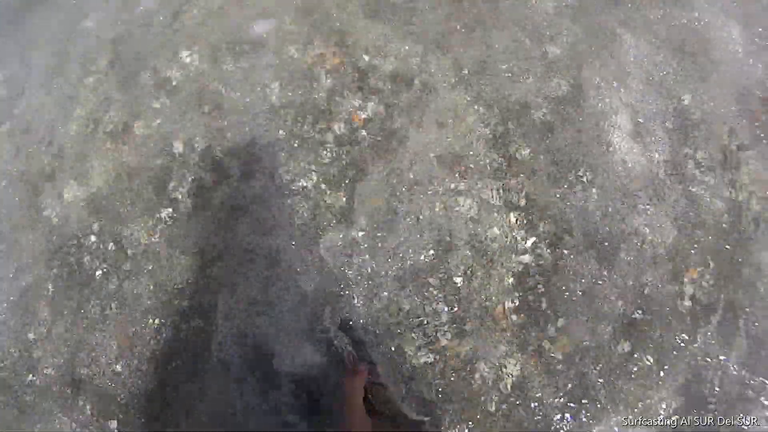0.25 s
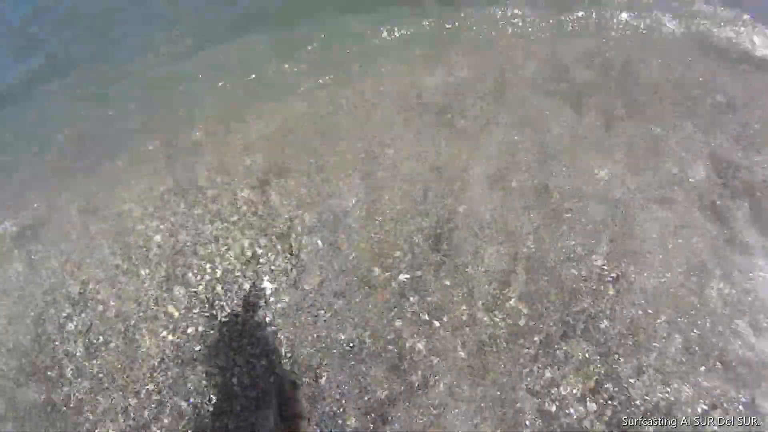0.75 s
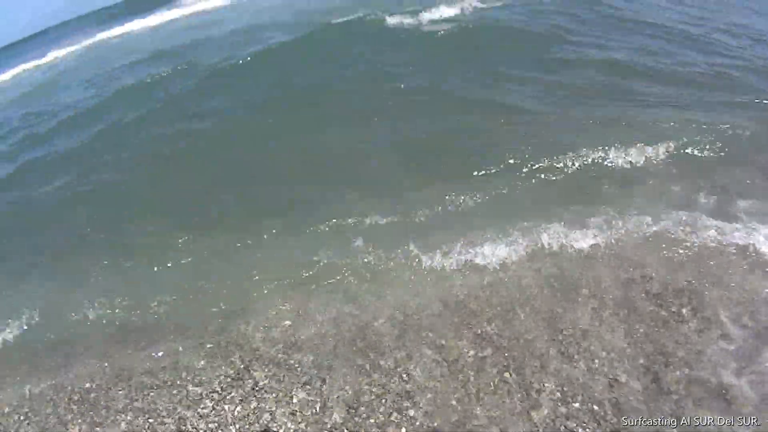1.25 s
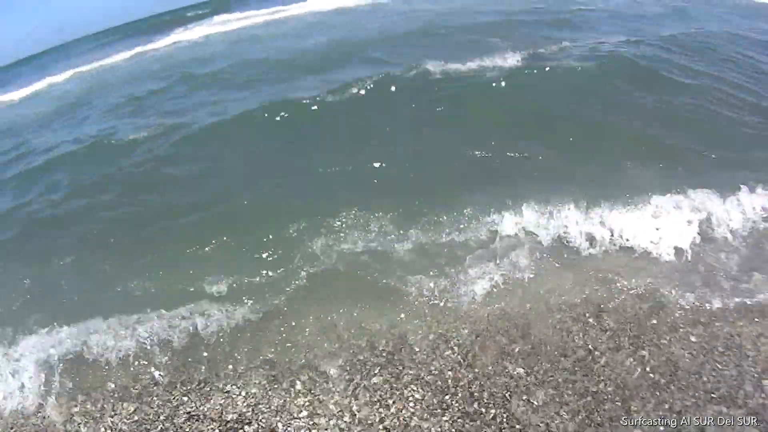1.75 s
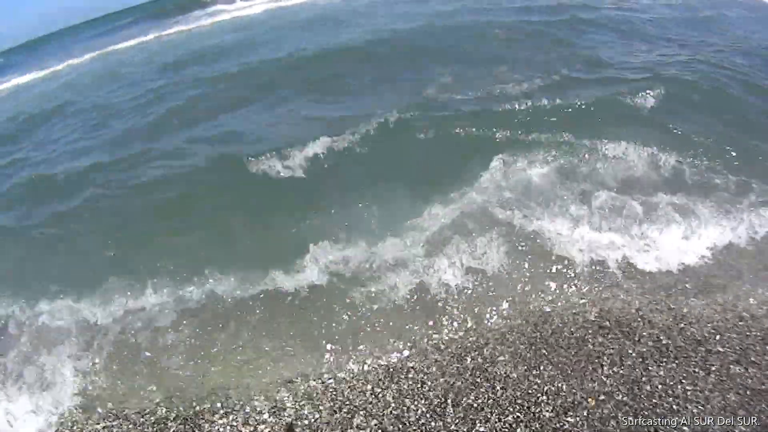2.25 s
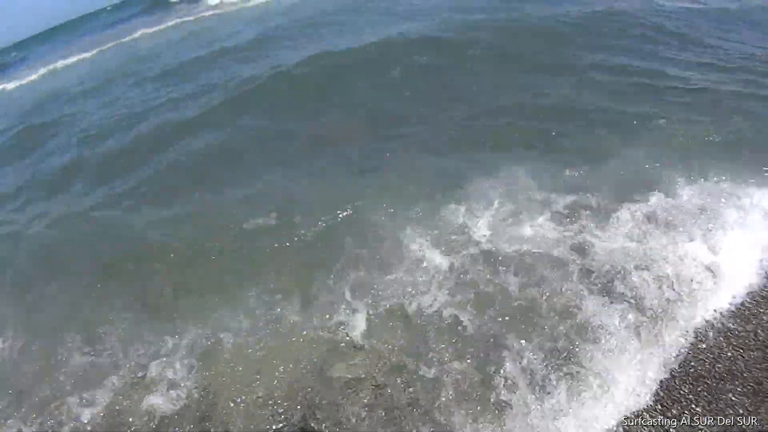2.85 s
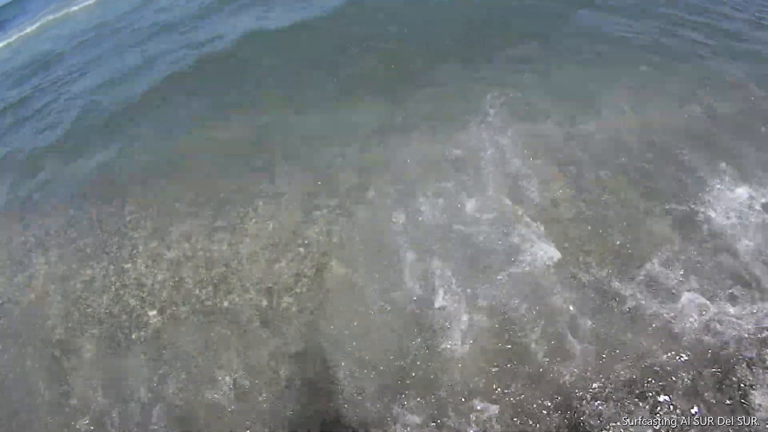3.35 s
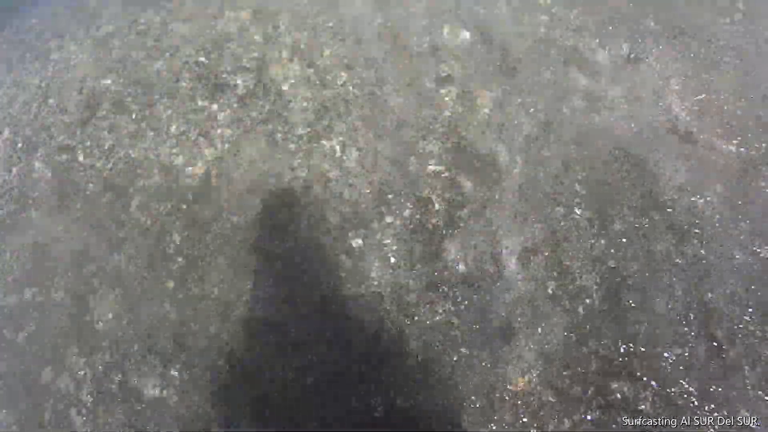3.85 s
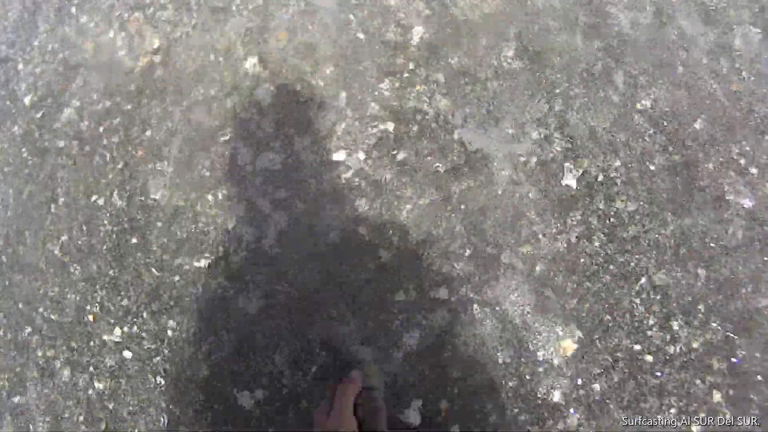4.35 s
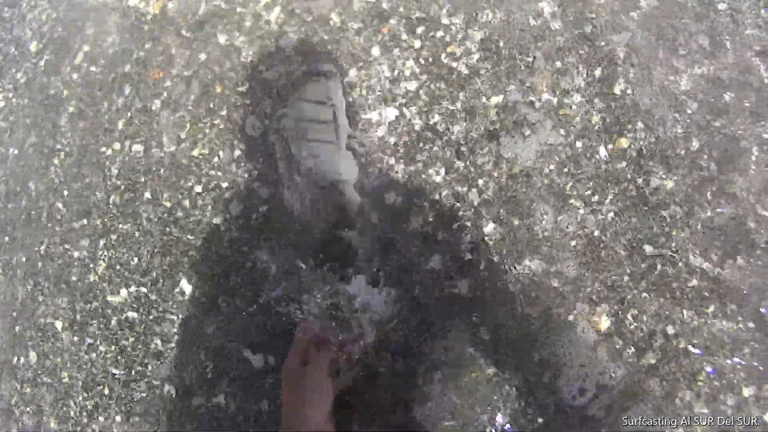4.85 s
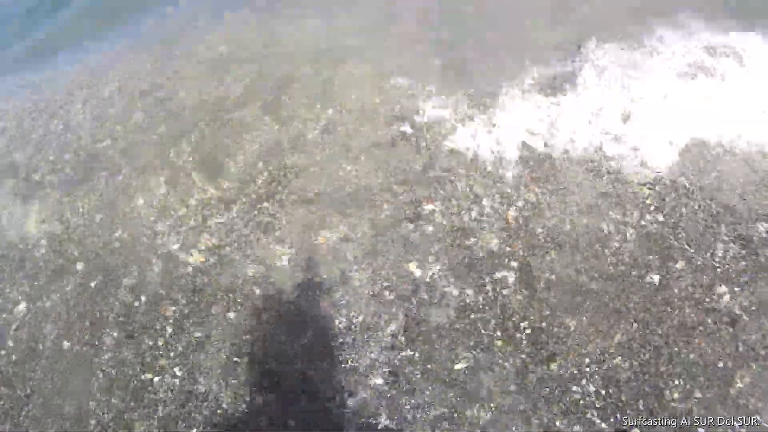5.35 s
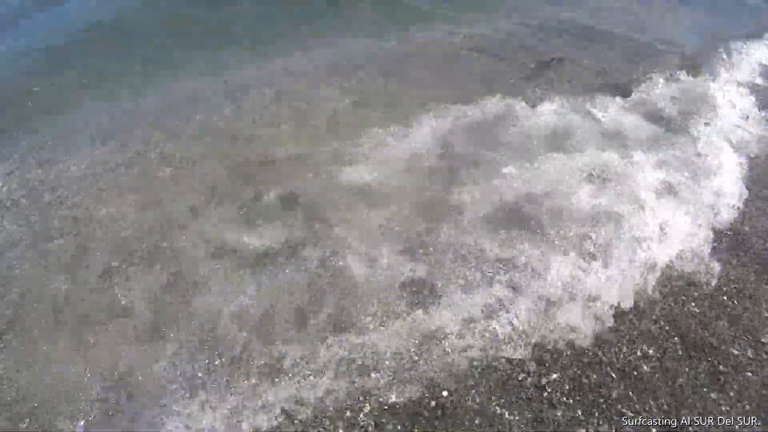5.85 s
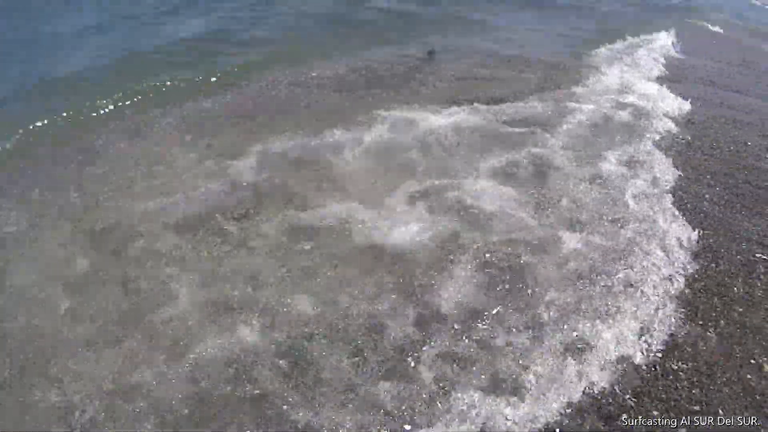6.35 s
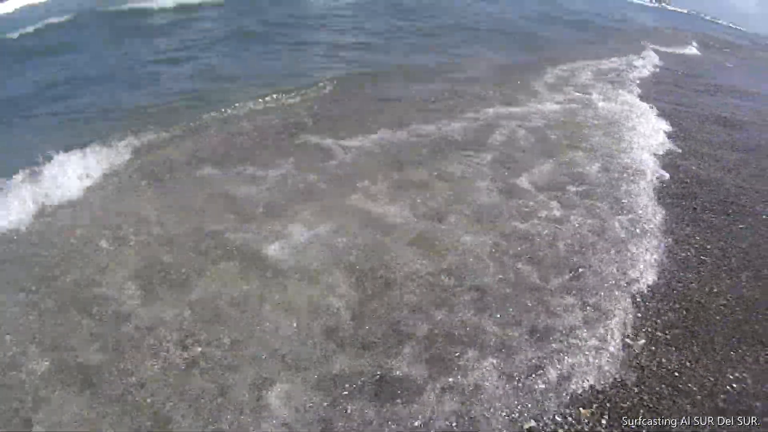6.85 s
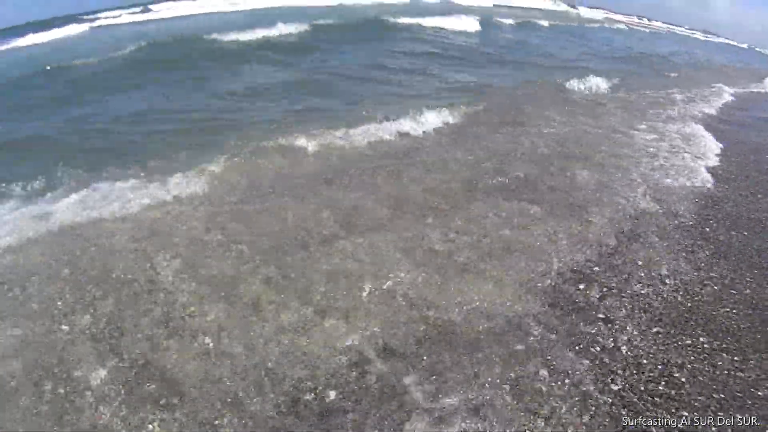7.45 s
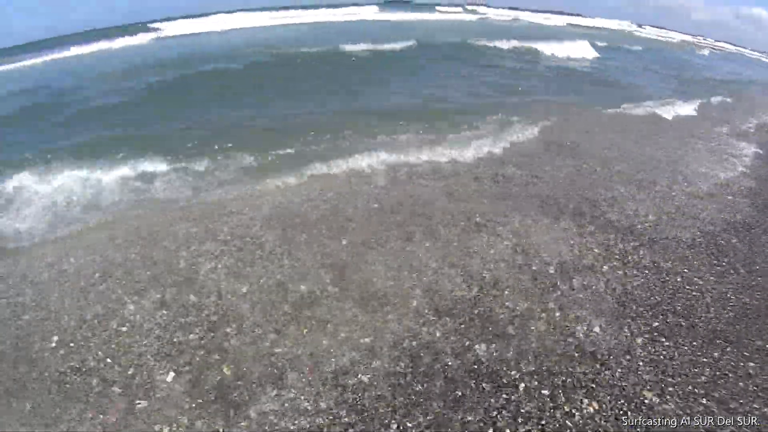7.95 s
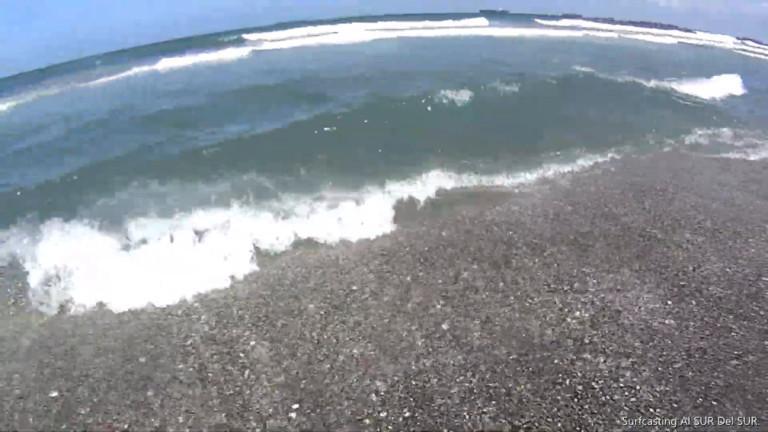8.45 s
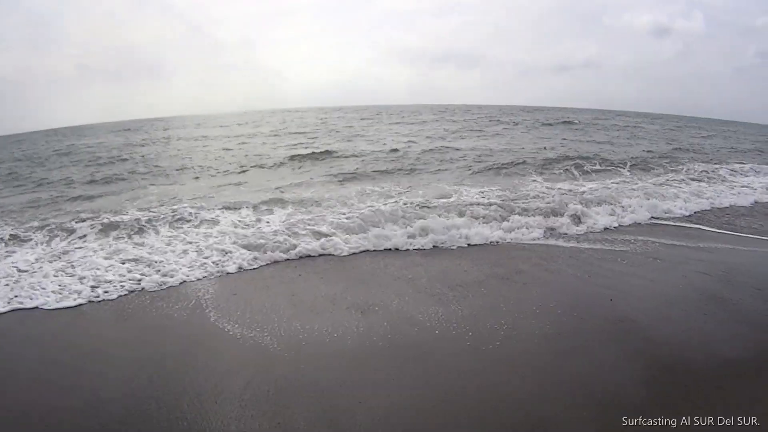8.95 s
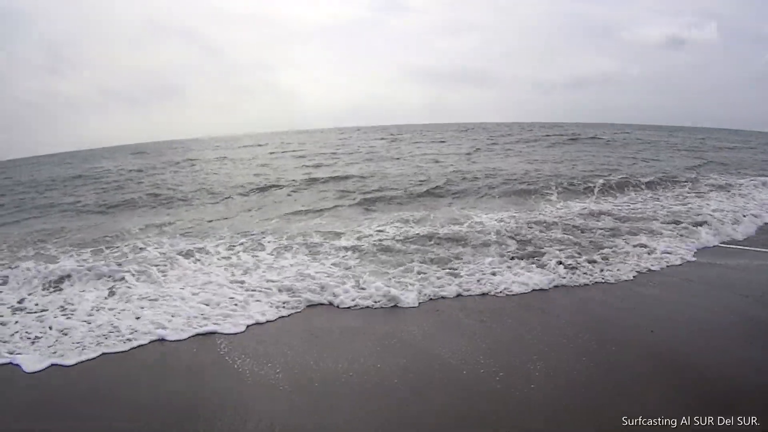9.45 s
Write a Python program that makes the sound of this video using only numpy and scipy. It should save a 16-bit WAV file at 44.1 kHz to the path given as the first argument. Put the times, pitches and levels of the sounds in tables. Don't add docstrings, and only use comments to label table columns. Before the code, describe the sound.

Small waves wash a pebble beach, heard through a sealed camera case that makes the hiss hollow and ringing. Water slaps at the feet, throwing drops and sharp ticks close by. A larger wave breaks near three seconds, plops follow around five, and another wave swells. Near nine seconds a quick fade leads to a softer, farther shore where one wave drains.

```python
import sys
import numpy as np
from scipy import signal
from scipy.fft import rfft, irfft, next_fast_len
from scipy.io import wavfile
from scipy.ndimage import uniform_filter1d

SR = 44100
rng = np.random.default_rng(int(sys.argv[2]) if len(sys.argv) > 2 else 0)


def level_to_linear(level):
    exponent = np.asarray(level, float) / 20
    return 10 ** exponent


def generate_wav(sig):
    pcm = np.round(np.clip(np.atleast_2d(sig).T, -1, 1) * 32767).astype(np.int16)
    wavfile.write(sys.argv[1], SR, pcm)


N = 428642
TIME = np.arange(N) / SR
SIZE = next_fast_len(N + 4096)
HZ = np.fft.rfftfreq(SIZE, 1 / SR)
CUT_S = 8.836


def evened(x):
    return x / np.sqrt(np.mean(x ** 2) + 1e-20)


def read(points, hz):
    f, value = np.transpose(points)
    return np.interp(np.log(hz + 1), np.log(f + 1), value)


def shaped(x, gain):
    return irfft(rfft(x, SIZE) * gain, SIZE)[..., :N]


def drift(rate, shape):
    width = max(round(1 / rate), 1)
    smooth = uniform_filter1d(rng.standard_normal(shape), width)
    return evened(uniform_filter1d(smooth, width))


LAYER_HZ = (4000, 7500, 1600, 500)
GRAINY = (1.17, 1.95, 0.39, 0.094)


def surf():
    levels, spray = waves()
    case = case_gain()
    foam = shaped(bubbles(spread_db=4.0, cycles=4.74, glide=0.081, clump_db=1.0, count=25000), case)
    smooth = shaped(hiss(patchy_db=0.82, surge_db=0.13, flicker_db=0.41), case)
    out = np.zeros((2, N))
    for hz, level, grainy in zip(LAYER_HZ, levels, GRAINY):
        part = read([(f, f == hz) for f in sorted(LAYER_HZ)], HZ)
        hissing, popping = shaped(np.array([smooth, foam]), part)
        share = np.clip(grainy * spray, 0, 1)
        water = np.sqrt(1 - share) * evened(hissing) + np.sqrt(share) * evened(popping)
        out += level_to_linear(level) * water
    return out


# (time [s], wash level [dB], share heard as separate bubbles [0-1])
NEAR_WAVES = [(0, -32.5, 0.2), (.6, -34.5, 0.14), (1, -33, 0.01), (1.4, -31.5, 0), (2.27, -29.5, .1),
              (2.58, -25.5, 0), (2.87, -24.5, 0.08), (3.41, -32.5, 0.12), (3.85, -34.5, .15),
              (4.45, -37, 0.08), (4.77, -37.5, 0.08), (5.25, -31.5, 0.19), (5.98, -32.5, 0.11),
              (6.15, -29, 0.16), (6.84, -29, 0.08), (7.2, -31.5, 0.15), (8.2, -29.5, 0.1),
              (8.83, -24.5, 0.1)]
# (time [s], level in the main case ring [dB])
FAR_SURF = [(0, -37), (.51, -37.5), (.76, -40.5), (1.37, -38), (2.32, -39), (2.6, -35), (2.87, -32),
            (3.1, -33.5), (3.35, -37.5), (3.7, -39.5), (4.21, -36.5), (4.58, -41.5), (4.9, -37),
            (5.6, -39.5), (6.51, -37), (7.3, -38.5), (8.05, -37.5), (8.83, -39)]
# (level at first [dB], fall after a second [dB])
CALM_SHORE = [
    (-38, 8),
    (-46.5, 5.5),
    (-46, 8.5),
    (-54.5, 7),
]


def waves():
    s, near_db, bubbly = np.transpose(NEAR_WAVES)
    jump_db, burst_db = slaps()
    wash = np.interp(TIME, s, near_db) + jump_db
    far = np.interp(TIME, *np.transpose(FAR_SURF))
    near_rise = wash + 30.5
    far_rise = far + 38
    fizz = -38.5 + 1.35 * near_rise + burst_db
    ring = far + 0.077 * jump_db
    roar = -47.5 + 0.27 * far_rise + 0.28 * near_rise
    after = TIME > CUT_S
    drained = (after * (TIME - CUT_S)) ** 1.5
    calm = [db - fall * drained for db, fall in CALM_SHORE]
    spray = np.interp(TIME, s, bubbly) + 0.02 * jump_db
    return np.where(after, calm, [wash, fizz, ring, roar]), np.where(after, 0.05, spray)


# (time [s], jump [dB], hold [s])
SLAPS = [(0.49, 2.5, .015), (1.433, 1.1, 0.16), (2.84, 1, 0.035), (3.88, 4.5, 0.36), (3.924, -0.5, .02),
         (4.096, 2, 0.055), (4.788, 5.5, 0.11), (4.93, 3, 0.16), (5.266, 1.5, .26), (5.61, 3, 0.12),
         (5.857, 1.5, .03), (6.057, 1, 0.036), (8.26, 1.5, 0.29)]


def slaps():
    rise_s, fall_s = 0.008, 0.056
    burst_s, burst_share = 0.018, 0.79
    jump_db, burst_db = np.zeros((2, N))
    for s, db, hold in SLAPS:
        t = np.maximum(TIME - s, 0)
        rise = db * np.minimum(t / rise_s, 1)
        jump_db += rise * np.exp(-np.maximum(t - hold, 0) / fall_s)
        burst_db += burst_share * rise * np.exp(-t / burst_s)
    return jump_db, burst_db


def bubbles(spread_db, cycles, glide, clump_db, count):
    where, pitch, luck, phase = rng.random((count, 4)).T[..., None]
    hz, n = 900 + 10000 * pitch, np.arange(160)
    turns = hz * n / SR
    ring = np.sin(2 * np.pi * (turns * (1 + glide * turns / cycles) + phase))
    ring *= turns * np.exp(-3 * turns / cycles)
    size = level_to_linear(spread_db * np.minimum(-np.log(luck), 4))
    ring *= size / np.linalg.norm(ring, axis=1, keepdims=True)
    at = (where * N).astype(int) + n
    x = np.bincount(at.ravel(), ring.ravel(), N + len(n))[:N]
    clumps = level_to_linear(clump_db * drift(40 / SR, N))
    return evened(with_scatter(x * clumps, 0.019))


def hiss(patchy_db, surge_db, flicker_db):
    frames = N // 64 + 5
    a, b = rng.standard_normal((frames, 129, 2, 2)).T
    patches = evened(uniform_filter1d(drift(.04, (129, frames)), 5, axis=0))
    field_db = patchy_db * patches + surge_db * drift(0.02, frames) + flicker_db * drift(.2, frames)
    noise = signal.istft((a + 1j * b) * level_to_linear(field_db), nperseg=256, noverlap=192)[1]
    return evened(noise[:, :N])


# (time [s], peak level [dB], pitch [Hz])
DROPS = [(.0794, -14.5, 4500), (.4944, -15, 3150), (1.5216, -16.5, 3350), (3.823, -17, 3300),
         (2.4912, -16, 3750), (2.5686, -15, 3820), (2.9367, -12, 3340), (4.168, -18, 2400),
         (3.997, -16.5, 3130), (4.0203, -12, 3370), (4.051, -15, 3200), (4.2283, -17, 3310),
         (4.7476, -14, 3500), (4.7895, -18, 3320), (4.8048, -15, 5350), (4.8717, -11, 3140),
         (4.9262, -13, 3150), (4.936, -13.5, 3910), (4.946, -16, 3200), (5.026, -20, 5900),
         (5.0863, -17, 3380), (5.7728, -17, 3290), (6.4091, -11.5, 3170), (6.7286, -16, 3400),
         (7.2474, -15, 5170), (7.8077, -16, 3020), (8.1539, -14.5, 3370), (8.2826, -15, 5400),
         (8.3537, -19, 3310), (8.4058, -14, 3600)]
# (time [s], peak level [dB], pitch [Hz])
TICKS = [(1.8908, -19.5, 6790), (0.0808, -22, 5400), (4.63, -32, 9500), (2.581, -17, 7160),
         (2.7067, -22, 7070), (2.729, -15, 7520), (2.83, -19, 7220), (2.8714, -20, 7220),
         (2.9073, -17, 6610), (3.8838, -21, 7270), (3.9302, -15.5, 7380), (4.2288, -21.5, 7120),
         (4.789, -19.5, 7400), (4.8125, -21, 6500), (4.8346, -17, 7800), (4.9906, -26, 7960),
         (5.0604, -22, 7290), (5.5672, -20, 7310), (5.026, -22, 9800), (5.8571, -21, 7670),
         (6.0846, -15.5, 7360), (6.2672, -20, 6660), (6.567, -21, 8200), (6.874, -20, 7270),
         (7.515, -21, 7500), (7.7832, -18.5, 7120), (8.3357, -23, 7630), (8.4038, -22, 8020),
         (8.5195, -22, 7340), (8.666, -22, 7560)]
# (time [s], peak level [dB], pitch [Hz], time to fade by 60 dB [s])
PLOPS = [
    (4.802, -26, 330, 0.037),
    (4.803, -20, 1200, .03),
    (4.803, -28, 910, 0.035),
    (2.99, -33, 790, .034),
    (6.81, -36, 235, 0.2),
    (6.7, -40, 138, .15),
    (6.84, -45, 65, .3),
    (2.58, -35, 330, .1),
    (6.03, -40, 160, 0.27),
    (1.218, -19, 1300, .025),
]


def close_splashes():
    drops = [(*row, 0.014) for row in DROPS]
    ticks = [(*row, 0.0072) for row in TICKS]
    close = splashes(drops, glide=0.042, crack=0.19, fizz=0.069)
    close += splashes(ticks, glide=0.05, crack=1.2, fizz=0.18)
    close += splashes(PLOPS, glide=0.092, crack=.05, fizz=.01)
    return close


def splashes(rows, glide, crack, fizz):
    x, t = np.zeros(N + 8000), np.arange(8000) / SR
    for s, db, hz, t60 in rows:
        burst = signal.lfilter([1, 0, 0, 0, -1], [1], rng.standard_normal(len(t)))
        ring = np.sin(2 * np.pi * hz * t * (1 + glide * t / t60)) * level_to_linear(-60 * t / t60)
        noise = burst * (crack * level_to_linear(-100 * t / t60) + fizz * level_to_linear(-12 * t / t60))
        onset = np.minimum(t * hz / 1.83, 1)
        at = round(s * SR)
        x[at:at + len(t)] += level_to_linear(db) * onset * (ring + noise)
    return with_scatter(x[:N], 0.027)


def with_scatter(x, t60):
    t = np.arange(600) / SR
    smear = rng.standard_normal(len(t)) * level_to_linear(-60 * t / t60)
    return np.array([x, signal.oaconvolve(x, smear / np.linalg.norm(smear))[:N]])


# (time [s], rise [dB], length [s])
GUSTS = [(.41, 6, .05), (.92, 11, 0.077), (1.98, 6, .15), (3.11, 5, .25), (5.3, 3, .3), (6.85, 9, .15),
         (7.23, 6, 0.2), (7.63, 5, .15), (7.95, 7, .12), (8.31, 3, .05), (8.92, 4, .15)]


def wind():
    level_db = np.where(TIME > CUT_S, -55.5, -61.5)
    for s, db, length in GUSTS:
        level_db = level_db + db * np.exp(-((TIME - s) / length) ** 2)
    lumps = rng.standard_normal((N, 2)).T * level_to_linear(1.4 * drift(8 / SR, N))
    rumble = HZ ** 2 / (HZ ** 2 + 18 ** 2) / (1 + (HZ / 60) ** 1.17)
    return level_to_linear(level_db) * evened(shaped(lumps, rumble))


# (pitch [Hz], level per Hz [dB])
CASE_COLOR = [(53, -51), (90, -18.5), (256, -11.5), (774, -14), (1070, -8), (1360, 1), (1530, -7.5),
              (1990, -14.5), (3230, -1.5), (4190, -7.5), (5230, -2.5), (5900, -7.5), (7660, -7.5),
              (9560, -14), (11000, -21.5), (14300, -81), (22000, -120)]
# (pitch [Hz], width [Hz], level [dB])
RIPPLE = [(970, 160, 1.5), (1500, 110, -2.5), (1650, 140, 3.5), (2250, 280, 1.5), (2600, 300, -2.5),
          (5900, 230, -2.5), (6150, 320, 2.5), (7460, 500, 1)]
# (pitch [Hz], width [Hz], level [dB])
MAIN_RING = [(1392, 75, 5), (1290, 90, -1), (1060, 60, -2.5)]


def case_gain():
    db = read(CASE_COLOR, HZ)
    for f, width, peak in RIPPLE + MAIN_RING:
        db = db + peak / (1 + (2 * (HZ - f) / width) ** 2)
    log_gain = np.log(level_to_linear(np.maximum(db, -100)))
    folded = irfft(log_gain, SIZE)
    folded[1:SIZE // 2] *= 2
    folded[SIZE // 2 + 1:] = 0
    return np.exp(rfft(folded))


def scene():
    return surf() + level_to_linear(-0.7) * close_splashes() + wind()


# (pitch [Hz], likeness [0-1])
LIKENESS = [(60, 0.91), (300, 0.8), (650, 0.44), (1000, 0.93), (1380, 1), (1600, 0.5), (2000, 0.65),
            (2400, 0.8), (3100, 0.89), (5200, 0.95), (5900, 0.97), (6300, 0.58), (7800, 0.54), (9800, 0.55),
            (10600, 1)]
# (pitch [Hz], phase [radians])
LEFT_LEAD = [(20, 0.27), (120, -0.12), (300, -0.68), (600, -1.26), (740, -1.2), (900, -1.53), (1450, -1.34),
             (1660, -0.76), (1920, -1.8), (2100, -1.6), (2650, -1.22), (3450, -0.83), (5500, -0.54),
             (7400, -0.42)]
# (pitch [Hz], left minus right [dB])
TILT = [(60, -2), (97, 1), (160, 0.0), (250, 0.5), (400, -0.5), (650, 0), (1050, 0.5), (1680, -2),
        (2710, -3), (4370, -3), (7030, -2), (11300, -1)]


def ports(dry):
    same, weaker = np.clip(read(LIKENESS, HZ), 0, 1), level_to_linear(-read(TILT, HZ))
    common = weaker * same * np.exp(-1j * read(LEFT_LEAD, HZ))
    own = weaker * np.sqrt(1 - same ** 2)
    middle = np.sqrt(abs(1 + common) ** 2 + own ** 2) / 2
    edge = 1 / middle / (1 + (HZ / 11060) ** 200)
    left = shaped(dry[0], edge)
    right = shaped(dry[0], common * edge) + shaped(dry[1], own * edge)
    return left, right


# (time [s], left minus right [dB])
CAMERA_TURN = [
    (0, -3),
    (.78, -2.5),
    (2.49, -2),
    (3.03, -3.5),
    (5.25, -3),
    (6.33, -2.5),
    (8.85, -2),
    (9.23, -4),
    (9.72, -3.5),
]


def camera_turn():
    turn_db = np.interp(TIME, *np.transpose(CAMERA_TURN))
    return level_to_linear((turn_db - turn_db.mean()) / 2)


def roll_off(x):
    return signal.sosfilt(signal.butter(12, 11920, fs=SR, output="sos"), x)


def record(dry):
    left, right = ports(dry)
    turn = camera_turn()
    fade_s = 0.047
    fade = np.sin(np.pi / 2 * np.clip(abs(TIME - CUT_S) / fade_s, .04, 1)) ** 2
    mix = np.array([left * turn, right / turn]) * fade
    return roll_off(mix)


dry = scene()
out = record(dry)
generate_wav(out)
```